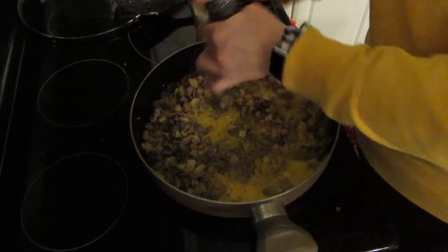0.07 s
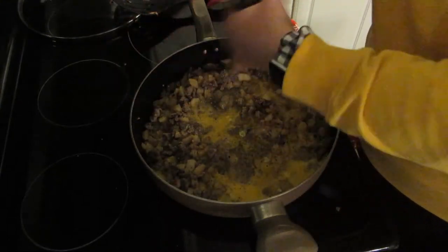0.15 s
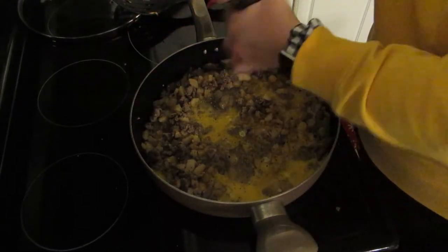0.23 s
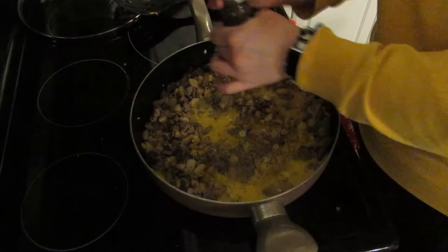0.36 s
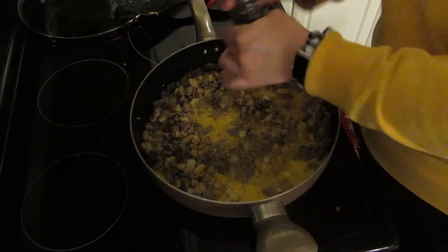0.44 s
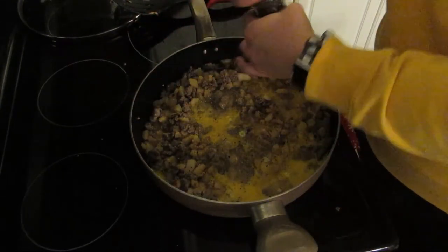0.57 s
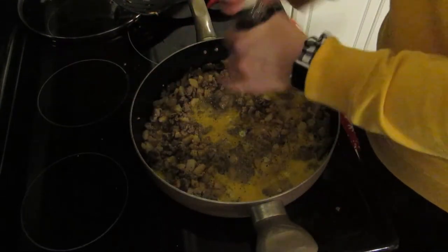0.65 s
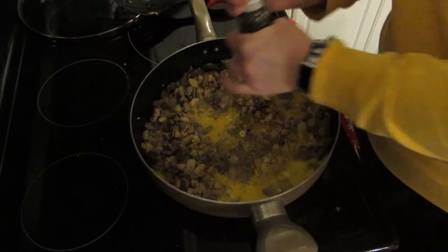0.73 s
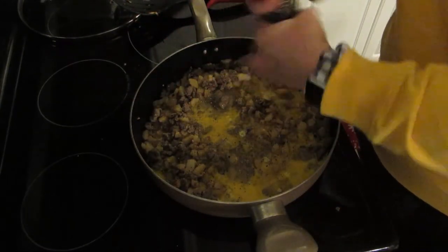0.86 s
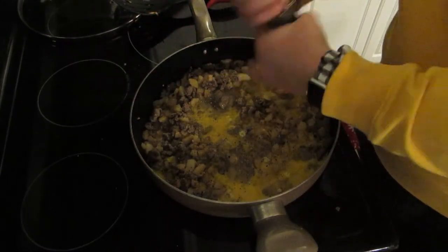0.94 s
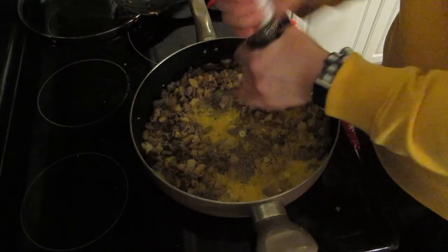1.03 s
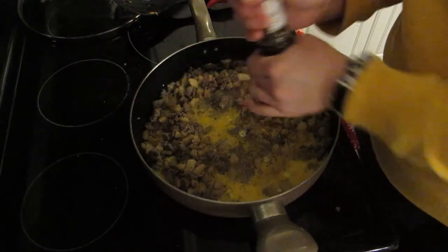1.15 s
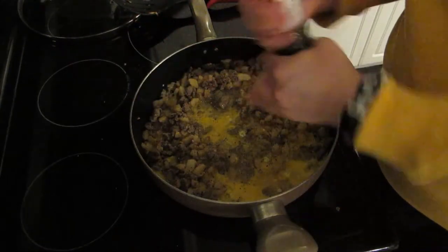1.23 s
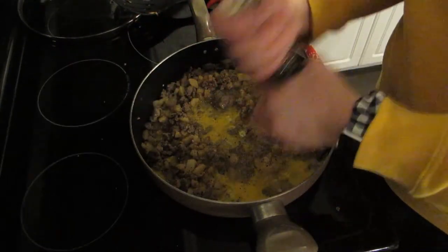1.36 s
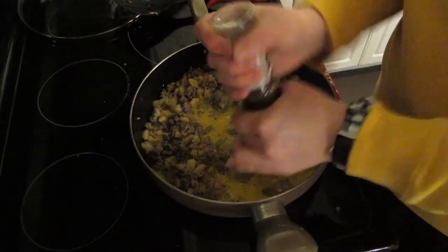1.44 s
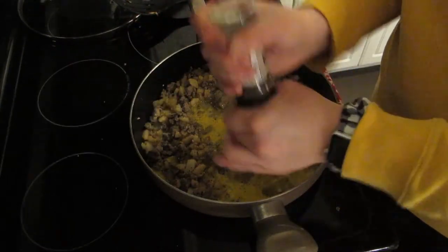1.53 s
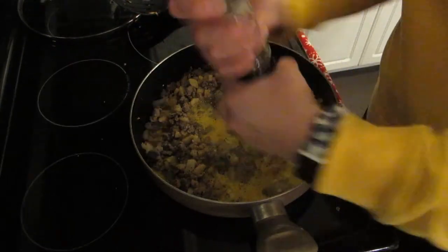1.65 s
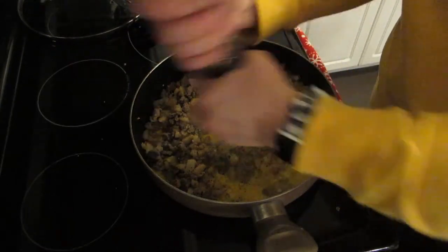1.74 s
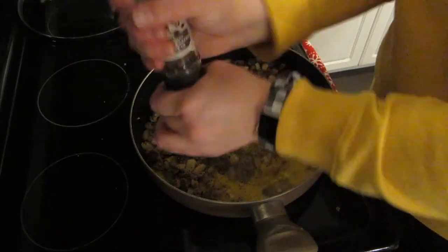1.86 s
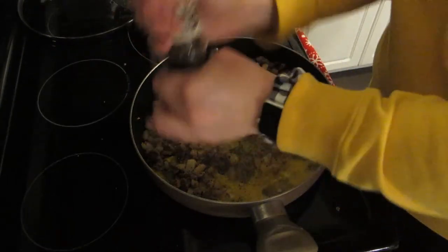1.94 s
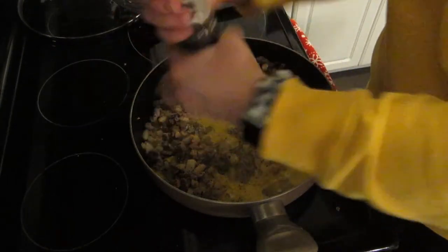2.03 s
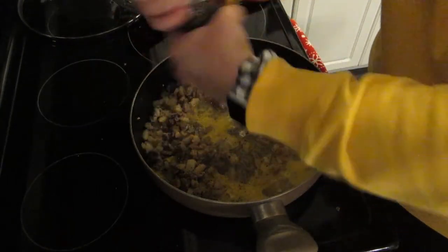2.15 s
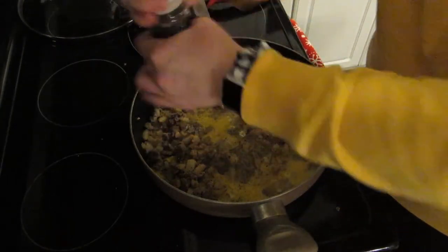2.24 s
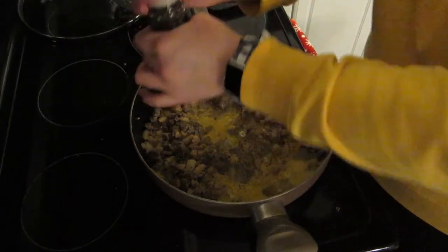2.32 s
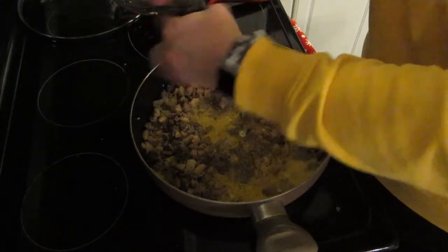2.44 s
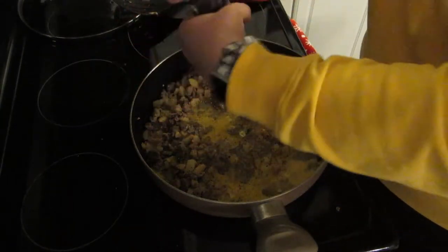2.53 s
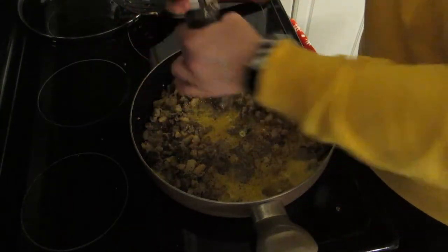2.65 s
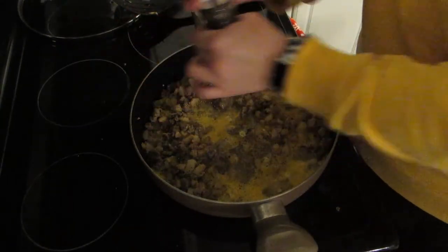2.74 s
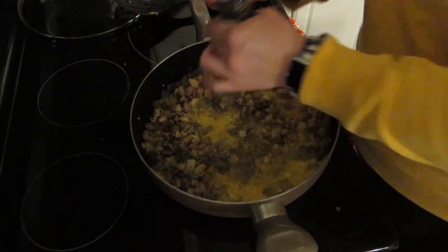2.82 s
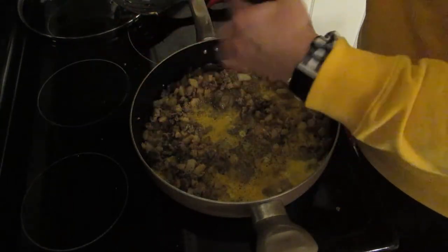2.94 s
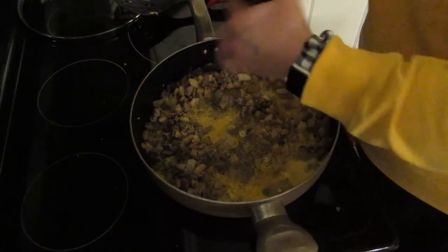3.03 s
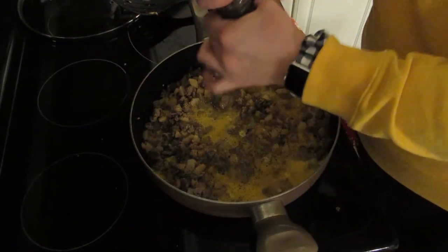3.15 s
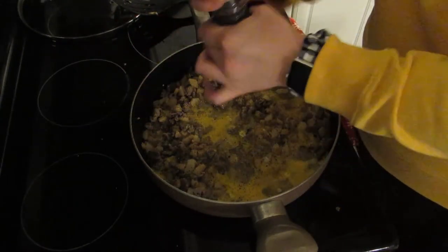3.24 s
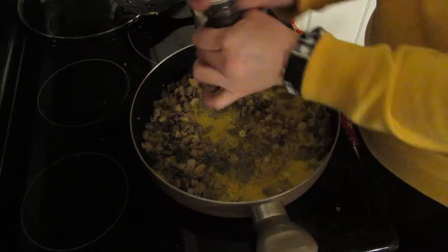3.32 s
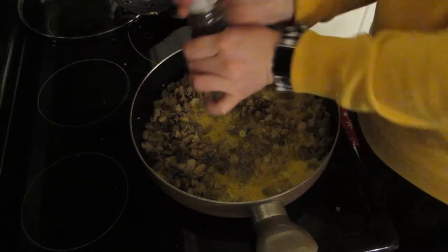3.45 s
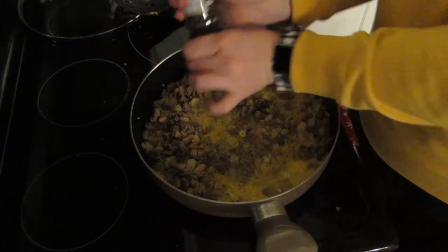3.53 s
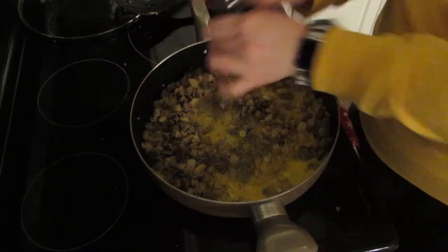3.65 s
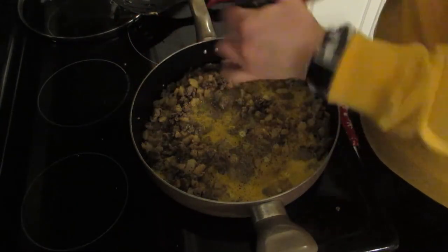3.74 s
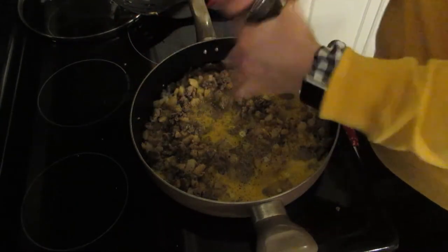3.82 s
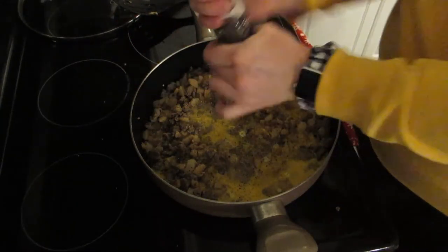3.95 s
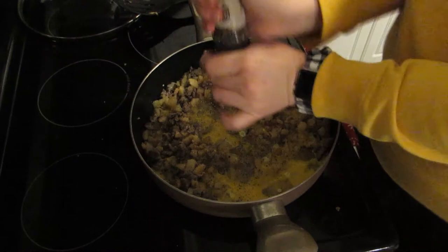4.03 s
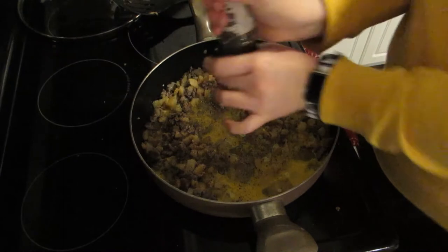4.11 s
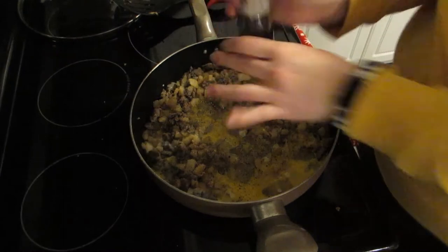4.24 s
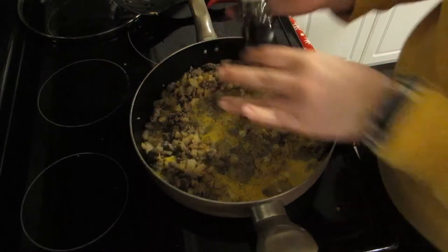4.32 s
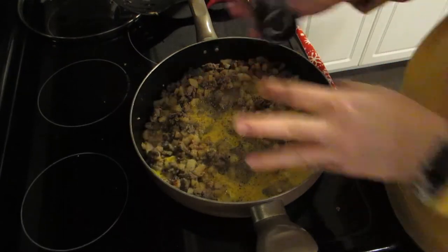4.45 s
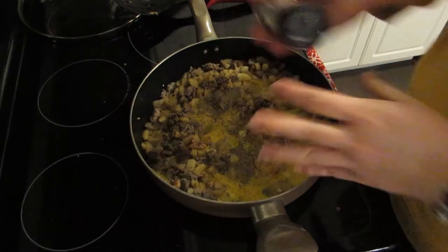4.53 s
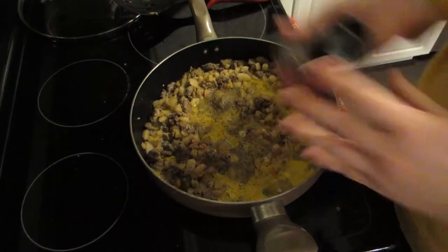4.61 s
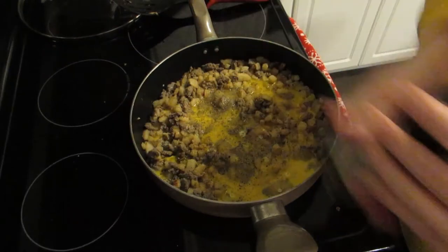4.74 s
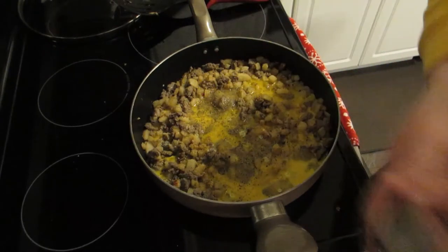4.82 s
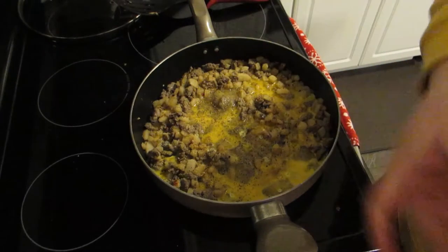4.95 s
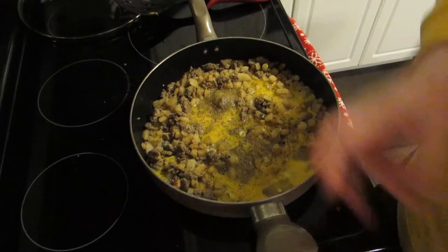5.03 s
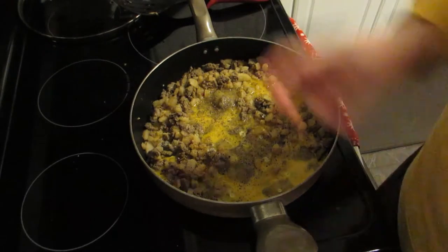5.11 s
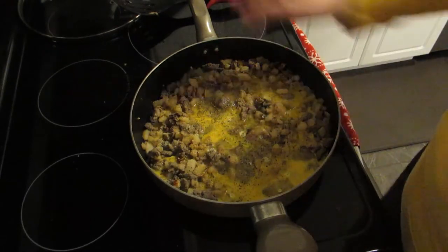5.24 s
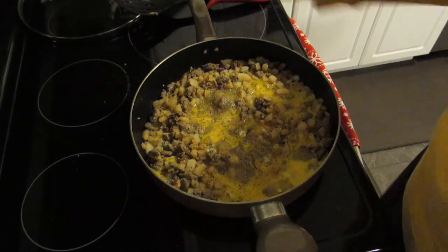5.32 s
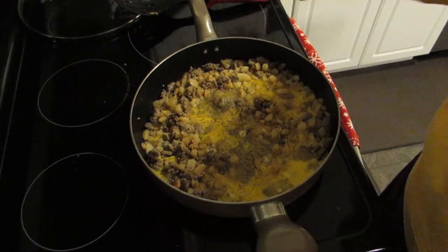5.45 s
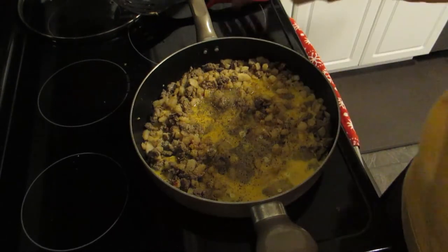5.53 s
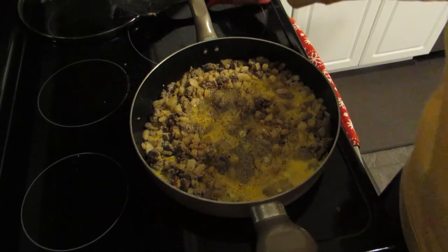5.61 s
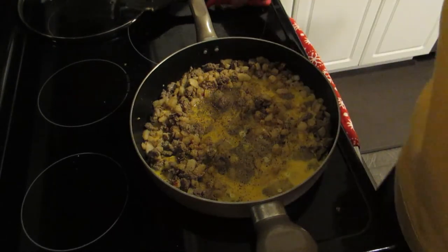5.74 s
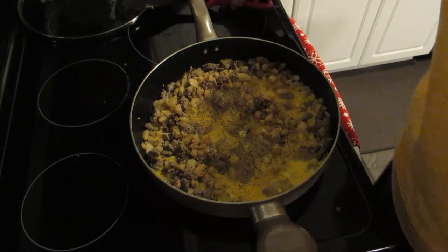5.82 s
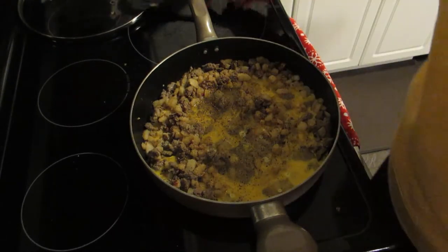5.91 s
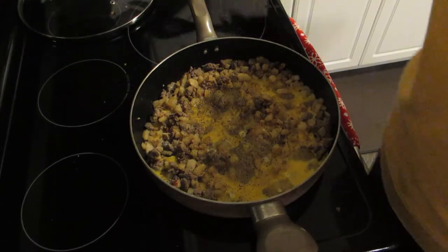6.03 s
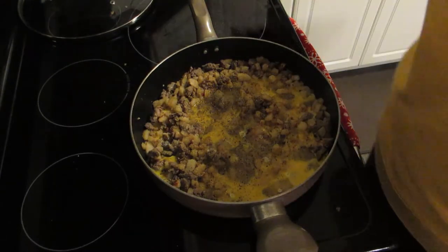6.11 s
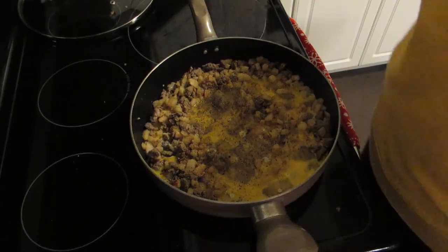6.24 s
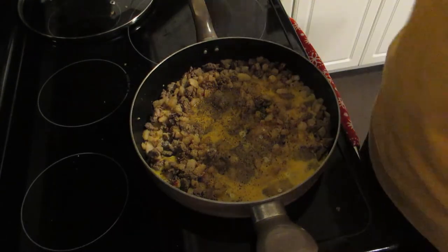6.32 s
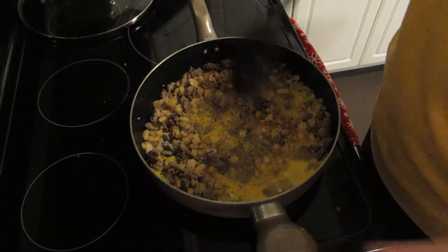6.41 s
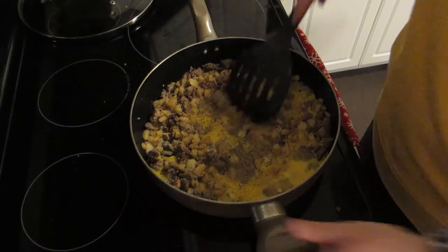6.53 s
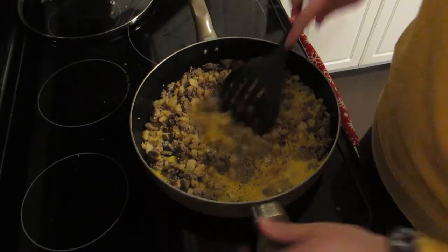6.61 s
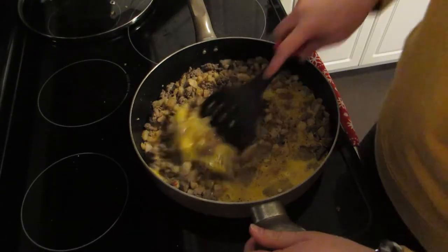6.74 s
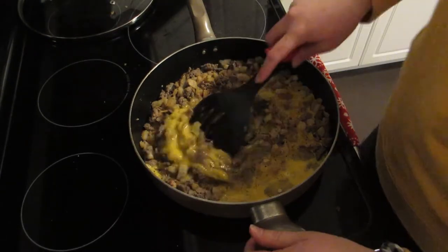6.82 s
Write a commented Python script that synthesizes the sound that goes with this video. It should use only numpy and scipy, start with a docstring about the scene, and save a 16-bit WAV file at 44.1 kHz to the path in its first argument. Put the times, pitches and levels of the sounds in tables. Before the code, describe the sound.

In a small kitchen, a hand-turned pepper mill crunches in short, gritty bursts with sharp cracks, roughly two or three a second, with a longer gap midway. Faint finger hiss fills some pauses. A soft brush follows the last twist, then a loud hollow cupboard bang with small rattling bounces, and finally a dull spatula bump and squelchy stir. Very faint sizzle lies beneath; close stereo microphone, short room echo.

```python
"""Small kitchen: a pepper mill is twisted by hand near a faintly sizzling pan.
Each twist crushes corns in a run of tiny noise-burst fractures that ring the mill body; sharp cracks ring its burr.
After longer pauses, fingers slide back with a thin resonant hiss; one long slide lets go.
Then a cupboard door bangs shut and bounces as decaying modes, and a spatula bumps the pan and stirs the food.
Sizzle and squelch are coloured random clicks; every source feeds a swaying noise reverberation."""
import sys
import numpy as np
from scipy import signal
from scipy.fft import rfft, irfft
from scipy.io import wavfile
from scipy.ndimage import uniform_filter1d

SR = 44100
rng = np.random.default_rng(int(sys.argv[2]) if len(sys.argv) > 2 else 0)


def log_audio(samples):
    """Write samples as a 16-bit WAV file to the path given in sys.argv[1]."""
    # one column per channel
    frames = np.atleast_2d(samples).T
    # limit to full scale, then quantise
    limited = np.clip(frames, -1, 1)
    pcm = np.round(limited * 32767).astype(np.int16)
    wavfile.write(sys.argv[1], SR, pcm)


N = 302967
TIME_S = np.arange(N) / SR
TOP_HZ = 15900

# Levels are relative: the layer gains below come on top.
# Diffuse air murmur. Each row: frequency in Hz, gain in dB.
AIR_COLOUR = [(40, -36), (100, -13), (190, -5), (420, -1.5), (750, -7.5), (1300, -12), (2200, -28),
              (4000, -48)]
# Reverberation time. Each row: band centre in Hz, t60 in seconds.
ROOM_T60_S = [(120, 0.31), (400, 0.4), (1500, 0.32), (4000, 0.28), (8000, 0.28), (15000, 0.11)]
# Side-channel gain of the reverberation. Each row: frequency in Hz, gain in dB.
ROOM_SIDE_DB = [(100, -46), (300, -27), (560, -15), (1100, -9), (2300, -27), (4500, -14), (8000, -8),
                (14000, -0.5)]
# Side-channel gain of the near scatter. Each row: frequency in Hz, gain in dB.
DIRECT_SIDE_DB = [(100, -46), (350, -22), (800, -9), (2500, -30), (4500, -29), (8000, -7.5), (14000, -7)]
# Background level of sizzle and air, dipping after loud sounds and recovering.
# Each row: time in seconds, level in dB.
BACKGROUND_LEVEL = [(0, -48), (3, -45), (3.6, -50), (4.2, -51), (4.8, -48), (5.4, -47), (5.75, -49),
                    (6.3, -48.5), (6.87, -43)]

# Sizzle and kitchen hum. Each row: frequency in Hz, gain in dB.
SIZZLE_COLOUR = [(15, -50), (25, -35), (59, -2.5), (116, -3.5), (284, -7.5), (403, -17), (461, -5.5),
                 (557, -26), (620, -12.5), (1090, -8), (1510, -7), (1980, -8.5), (3990, -10),
                 (13100, -15.5), (15800, -20)]
# Larger spits of fat. Each row: time in seconds, level in dB.
SPITS = [(4.7591, -30), (4.8544, -27), (5.1981, -28), (5.3288, -27), (5.467, -26), (6.3116, -26)]
# Spatula bumps on the pan. Each row: time in seconds, level in dB, contact cut-off in Hz.
BUMPS = [(6.443, -41, 620), (6.6, -32, 180), (6.671, -22.5, 110)]
# Dull pan modes. Each row: frequency in Hz, level in dB, t60 in seconds.
PAN_MODES = [(93, -6.5, 0.14), (131, -4.5, 0.087), (199, -6, 0.085), (424, -3, 0.057)]
# Spatula push. One row: peak in seconds, level in dB, attack and release time constants in seconds.
STIR = (6.735, -32.5, .047, .07)
# Squelch of the food. Each row: frequency in Hz, gain in dB.
STIR_COLOUR = [(120, -17), (220, -1.5), (350, -7.5), (470, 3), (590, -4.5), (850, 4), (1150, -1),
               (1700, -9.5), (2600, -12.5), (5000, -19), (10600, -17.5), (15500, -26)]

# Door bang and bounces. Each row: time in seconds, level in dB, contact cut-off in Hz.
KNOCKS = [(5.578, 0.5, 1200), (5.587, -14, 800), (5.746, -15.5, 1500), (5.793, -17, 280), (5.843, -11, 480),
          (5.863, -11.5, 560)]
# Door modes. Each row: frequency in Hz, level in dB, t60 in seconds.
DOOR_MODES = [(151, -8.5, 0.06), (212, -10, 0.063), (308, -3, 0.048), (434, -4, 0.042), (630, -9, .07),
              (697, -15.5, .08), (795, -18.5, 0.074), (1035, -9.5, 0.027), (1253, -17, 0.039),
              (1460, -10.5, 0.027), (1870, -18.5, .04), (2260, -19.5, 0.034)]
# Door catch modes. Each row: frequency in Hz, level in dB, t60 in seconds.
CATCH_MODES = [(1130, 0, 0.076), (1703, 7, 0.019), (2400, -6, 0.034), (2720, -7, 0.04), (3170, -7, 0.066),
               (3386, -2.5, 0.022), (4980, -17, 0.045)]
# Catch rattle after each knock; its level only partly follows the blow (dB per dB).
RATTLE_LAG_S, RATTLE_DB, RATTLE_DB_PER_DB = .003, -24, .6
# Soft buffer contact before the bang. One row: lead in seconds, level in dB, contact cut-off in Hz.
TOUCH = (.045, -11.5, 300)
# Buffer mode. Each row: frequency in Hz, level in dB, t60 in seconds.
BUFFER_MODES = [(152, 0, 0.055)]

# Handling of the mill. One row: level in dB, end in seconds, release time constant in seconds.
HANDLING = (-57.5, 3.8, .15)
# Handling rumble. Each row: frequency in Hz, gain in dB.
RUMBLE_COLOUR = [(25, -27), (50, -11), (72, 0), (92, -7), (120, -4), (200, -10), (450, -14), (1000, -28)]
# Mill resonances under sliding skin. Each row: frequency in Hz, width in Hz, level in dB.
SLIDE_RINGS = [(5904, 400, 7), (10470, 800, -4), (14750, 520, 0)]
# A pause longer than REGRIP_S brings a slide, centred SLIDE_LEAD_S ahead of the next bite.
REGRIP_S, SLIDE_LEAD_S, SLIDE_S, SLIDE_DB = .2, .115, .16, -48
# Long slide as the hand lets go. One row: middle in seconds, length in seconds, level in dB.
LET_GO = (4.513, .3, -47)
# Palm brushing off. One row: peak in seconds, level in dB, attack and release time constants in seconds.
BRUSH = (4.483, -34, .017, .055)
# Brush hiss. Each row: frequency in Hz, gain in dB.
BRUSH_COLOUR = [(2940, -60), (5000, -34), (5870, -19), (6800, -19), (7340, -10), (9250, -15), (10100, -2),
                (11000, -8), (13100, 0), (13900, 1), (15500, -23)]

# Wrist twists. Each row: teeth catch in seconds, full bite in seconds, end in seconds, level in dB,
# dying-away time constant in seconds, brightness in dB per octave.
TWISTS = [(0, 0, .008, -28, .034, -1), (.229, .25, .306, -17.3, .018, -.2),
          (.604, .62, .668, -18.7, .019, -.4), (.974, .989, 1.114, -17, .0076, -.2),
          (1.369, 1.383, 1.428, -18.3, .0093, -.7), (1.76, 1.765, 1.842, -18.8, .042, -.1),
          (2.165, 2.184, 2.259, -18.8, .036, -.7), (3.095, 3.11, 3.13, -20, .005, .5),
          (3.206, 3.21, 3.327, -27.3, .01, .6), (3.335, 3.339, 3.396, -20.7, .04, .9),
          (3.888, 3.894, 3.997, -19.5, .006, -.3)]
# Sharp cracks and burr slips. Each row: time in seconds, level in dB, brightness in dB per octave,
# burr level in dB.
CRACKS = [(.2687, -1.5, .8, -26), (.3136, -2, 1, -26), (.6373, -3, -.3, -28), (.9884, -3, -.7, -26),
          (1.3845, -1.5, 2.5, -30), (1.418, -10, 0, -13), (1.7666, -3.5, 1, -30), (1.7799, -3, -.8, -30),
          (2.2513, -1, -2, -28), (2.3151, -4.5, -1.7, -30), (2.5958, -4, .4, -23), (2.7609, -3, 1.6, -14),
          (3.112, -1.5, -.7, -8.5), (3.1344, -4.5, .5, -20), (3.2051, 4, 0, -24), (3.3388, -2.3, -.3, -28),
          (3.3681, -4, 0, -30), (3.8949, 2, 2, -26), (3.9677, -.5, -.4, -26), (3.9956, -2.5, 1.8, -30)]
# Mill body colour. Each row: frequency in Hz, gain in dB.
MILL_COLOUR = [(100, -43), (190, -23), (260, -10.5), (450, -7.5), (620, -9.5), (1100, -4.5), (2400, 1),
               (3300, -2.2), (5000, -4.5), (8400, -11.5), (11000, -10), (15500, -15)]
# Mill body resonances. Each row: frequency in Hz, width in Hz, level in dB.
MILL_RINGS = [(450, 97, -6.5), (1490, 310, -9.5), (2520, 270, -12), (4014, 390, 1.5), (6740, 940, 0.5),
              (10050, 990, -4)]
# Burr modes. Each row: frequency in Hz, level in dB, t60 in seconds.
BURR_MODES = [(3800, -6, 0.028), (4050, -4.5, 0.031), (4290, -2, 0.026), (4590, -6.5, 0.02),
              (5060, -7, 0.021), (9620, -6, .035), (10370, -6, 0.03), (11000, -11, 0.025)]
# Burr contact cut-off, and its rise in octaves per (dB per octave) of crack brightness.
CONTACT_HZ, CONTACT_RISE_OCTAVES = 5800, .6
# Catch tick relative to its twist.
GRAB_DB = -8


def undb(db):
    """Decibels to gain."""
    return 10 ** (np.asarray(db) / 20)


def unit(x):
    """Scale to rms 1."""
    return x / np.sqrt(np.mean(x ** 2))


def curve(rows):
    """Gain over time, interpolated in dB from (s, dB) rows."""
    s, db = np.transpose(rows)
    return undb(np.interp(TIME_S, s, db))


def swell(peak_s, db, attack_s, release_s):
    """Gain that grows exponentially to a peak and dies away."""
    return undb(db) * np.exp(-np.maximum((peak_s - TIME_S) / attack_s, (TIME_S - peak_s) / release_s))


def held(db, end_s, release_s):
    """Gain that holds, then dies away exponentially."""
    return undb(db) * np.exp(-np.maximum(TIME_S - end_s, 0) / release_s)


def stroke(middle_s, length_s, db):
    """Gain of a hand movement that speeds up and slows again."""
    return undb(db) * np.cos(np.pi * np.clip((TIME_S - middle_s) / length_s, -.5, .5))


def bins(size):
    """Frequencies of a real spectrum in Hz."""
    return np.fft.rfftfreq(size, 1 / SR)


def at(points, hz):
    """Read (Hz, value) points on a log-frequency axis."""
    f, value = np.transpose(points)
    return np.interp(np.log(hz + 1), np.log(f), value)


def colour(x, points):
    """Shape a steady sound by (Hz, dB) points."""
    size = x.shape[-1]
    return irfft(rfft(x) * undb(at(points, bins(size))), size)


def humps(rings, hz):
    """Summed bell-shaped response of (Hz, width Hz, dB) resonances."""
    return sum(undb(db) / (1 + (2 * (hz - f) / width) ** 2) for f, width, db in rings)


def causal(db, size):
    """Minimum-phase impulse response of unit energy: no sound ahead of the hit."""
    cepstrum = irfft(np.log(undb(db)))
    cepstrum[1:size // 2] *= 2
    cepstrum[size // 2 + 1:] = 0
    response = irfft(np.exp(rfft(cepstrum)))
    return response / np.linalg.norm(response)


def through(x, response):
    """Convolve, keeping the length."""
    return signal.fftconvolve(x, response)[:N]


def place(times_s, sounds):
    """Lay short sounds on the time line."""
    out = np.zeros(N)
    for s, sound in zip(times_s, sounds):
        i = int(np.clip(s * SR, 0, N - 1))
        out[i:i + len(sound)] += sound[:N - i]
    return out


def crackle(rate_hz, spread_db):
    """Random clicks of scattered size and sign, rms 1."""
    sizes = undb(spread_db * np.clip(rng.standard_normal(N), -2, 2))
    hits = rng.random(N) < rate_hz / SR
    return unit(hits * sizes * rng.choice([-1, 1], N))


def fractures(times_s, db, pitch_hz, tilt_db, decay_s, hump_db=4.5, hump_octaves=0.32, size=512):
    """Each fracture is a short noise burst with a spectral hump at its pitch and a tilt in dB per octave."""
    t = np.arange(size) / SR
    envelope = np.sqrt(t / decay_s) * np.exp(-t / decay_s)
    octaves = np.log2(np.clip(bins(size), 250, 14000) / pitch_hz[:, None])
    hump = hump_db * np.exp(-(octaves / hump_octaves) ** 2)
    shape = undb(tilt_db[:, None] * octaves + hump)
    noise = rng.standard_normal((len(times_s), size))
    grit = irfft(rfft(noise) * shape) * envelope
    # equal energy per burst, whatever its colour
    grit *= np.linalg.norm(envelope) / np.linalg.norm(grit, axis=1, keepdims=True)
    return 2 * place(times_s, grit * undb(db)[:, None])


def blows(rows, modes, thud_db, thud_s, low_hz):
    """Blows ring an object's modes and a short noise thud; a softer contact leaves out the highs."""
    t = np.arange(SR // 2) / SR
    ring = np.zeros(len(t))
    for k, (hz, db, t60_s) in enumerate(modes):
        ring += (-1) ** k * undb(db) * np.sin(2 * np.pi * hz * t) * 1000 ** (-t / t60_s)
    sounds = []
    for _, db, soft_hz in rows:
        thud = undb(thud_db) * rng.standard_normal(len(t)) * np.exp(-t / thud_s)
        contact = signal.butter(2, min(soft_hz, SR / 3), fs=SR, output="sos")
        sounds.append(undb(db) * signal.sosfilt(contact, ring + thud))
    # a high-pass thins what lies below low_hz
    high_pass = signal.butter(2, low_hz, "high", fs=SR, output="sos")
    return signal.sosfilt(high_pass, place([row[0] for row in rows], sounds))


def air(air_db=-9):
    """Soft low noise all round, separate for each ear, at the background level."""
    murmur = unit(colour(rng.standard_normal((2, N)), AIR_COLOUR))
    return undb(air_db) * curve(BACKGROUND_LEVEL) * murmur


def reverberation(build_s=0.0013):
    """A diffuse noise tail of unit energy whose bands die at their own rates."""
    t = np.arange(SR * 3 // 4) / SR
    noise, hz = rfft(rng.standard_normal(len(t))), bins(len(t))
    tail = np.zeros(len(t))
    for k, (_, t60_s) in enumerate(ROOM_T60_S):
        share = at([(f, float(j == k)) for j, (f, _) in enumerate(ROOM_T60_S)], hz)
        tail += irfft(noise * share, len(t)) * np.exp(-np.log(1000) * t / t60_s)
    tail *= 1 - np.exp(-(t / build_s) ** 2)
    return tail / np.linalg.norm(tail)


def kitchen(x, sway_hz=5., count=3):
    """The echo pattern of every source sways steadily among several noise tails."""
    out = np.zeros(N)
    for k in range(count):
        sway = np.cos(2 * np.pi * sway_hz * TIME_S + np.pi * k / count)
        out += through(x * sway, reverberation())
    return out * np.sqrt(2 / count)


def near_surfaces(decay_s=0.006, size=512):
    """Decaying noise response: scatter off hob and pan, which differs between the ears."""
    scatter = rng.standard_normal(size) * np.exp(-np.arange(size) / SR / decay_s)
    return scatter / np.linalg.norm(scatter)


def sizzle(pops_db=-3, bed_db=-3, spit_db=-7.5, spit_hz=5500):
    """Tiny bursting bubbles click over a bed of hiss and room hum, with a few louder spits."""
    bed = undb(bed_db) * rng.standard_normal(N)
    pops = undb(pops_db) * crackle(rate_hz=450, spread_db=3)
    s, db = np.transpose(SPITS)
    pitch_hz, tilt_db = np.full(len(s), spit_hz), np.full(len(s), -1.5)
    spits = fractures(s, db + spit_db, pitch_hz, tilt_db, decay_s=.001, hump_db=9)
    return unit(colour(bed + pops, SIZZLE_COLOUR)) * curve(BACKGROUND_LEVEL) + spits


def spatula():
    """The blade bumps the pan's modes and squelches through the food as coloured clicks."""
    squelch = unit(colour(crackle(rate_hz=700, spread_db=1), STIR_COLOUR))
    bumps = blows(BUMPS, PAN_MODES, thud_db=10, thud_s=0.021, low_hz=70)
    return squelch * swell(*STIR) + bumps


def cupboard(catch_hardness=2.8):
    """The door touches its buffer, bangs shut and bounces; its harder catch rattles along."""
    lead_s, touch_db, touch_hz = TOUCH
    touch_row = (KNOCKS[0][0] - lead_s, touch_db, touch_hz)
    touch = blows([touch_row], BUFFER_MODES, thud_db=-5, thud_s=0.0081, low_hz=89)
    panel = blows(KNOCKS, DOOR_MODES, thud_db=-5.5, thud_s=0.0055, low_hz=55)
    rattle_rows = [(s + RATTLE_LAG_S, RATTLE_DB + RATTLE_DB_PER_DB * db, catch_hardness * hz)
                   for s, db, hz in KNOCKS]
    rattles = blows(rattle_rows, CATCH_MODES, thud_db=-12, thud_s=0.007, low_hz=800)
    return touch + panel + rattles


def handling(rumble_db=-1):
    """The turning mill and the moving arms add low-coloured noise."""
    return undb(rumble_db) * held(*HANDLING) * unit(colour(rng.standard_normal(N), RUMBLE_COLOUR))


def fresh_grips():
    """Rows of the twists that follow a pause."""
    rows = np.array(TWISTS)
    pauses_s = rows[1:, 1] - rows[:-1, 2]
    return rows[1:][pauses_s > REGRIP_S]


def fingers(flutter_db=3.5):
    """Skin sliding over the mill hisses in its narrow high resonances; the palm brushes off it."""
    hiss = unit(irfft(rfft(rng.standard_normal(N)) * humps(SLIDE_RINGS, bins(N)), N))
    bites_s = fresh_grips()[:, 1]
    speed = sum(stroke(s - SLIDE_LEAD_S, SLIDE_S, SLIDE_DB) for s in bites_s) + stroke(*LET_GO)
    flutter = undb(flutter_db * unit(uniform_filter1d(rng.standard_normal(N), size=900)))
    brush = unit(colour(crackle(rate_hz=5500, spread_db=11), BRUSH_COLOUR))
    return hiss * speed * flutter + brush * swell(*BRUSH)


def grabs(pitch_hz=4000, tilt_db=-.3):
    """With each fresh grip the teeth catch on the corns: one small fracture tick."""
    catch_s, _, _, db, _, _ = fresh_grips().T
    pitches_hz, tilts_db = np.full(len(db), pitch_hz), np.full(len(db), tilt_db)
    return fractures(catch_s, db + GRAB_DB, pitches_hz, tilts_db, decay_s=.0016, hump_db=2.5)


def crushing(rate_hz=300, scatter_db=3.5, crumb_hz=2600, spread_octaves=1.3, bite_db=20, count=170):
    """The burr bites, then corns crumble in quick uneven succession, fading as the wrist stops."""
    out = np.zeros(N)
    for catch_s, bite_s, end_s, level_db, ease_s, tilt_db in TWISTS:
        gap, size, pitch, tilt = rng.standard_normal((count, 4)).T
        times_s = catch_s + np.cumsum(np.exp(0.55 * gap)) / rate_hz
        rise_db = np.interp(times_s, [catch_s, max(catch_s, bite_s)], [-bite_db, 0])
        fall_db = 20 / np.log(10) * np.maximum(times_s - end_s, 0) / ease_s
        db = level_db + rise_db - fall_db + scatter_db * np.clip(size, -2, 1.5)
        pitch_hz = crumb_hz * 2 ** (spread_octaves * pitch)
        out += fractures(times_s, db, pitch_hz, tilt_db + 0.42 * tilt, decay_s=0.0012)
    return out


def mill(crack_db=-10, crack_hz=2600, crush_db=-2.5, crumbs_db=1, size=2048):
    """Catches, crumbling, cracks and loose crumbs ring one small body; cracks and slips ring the burr."""
    s, db, tilt_db, burr_db = np.transpose(CRACKS)
    cracks = fractures(s, db + crack_db, np.full(len(s), crack_hz), tilt_db, decay_s=0.0016, hump_db=1.2)
    crumbs = undb(crumbs_db) * held(*HANDLING) * crackle(rate_hz=2000, spread_db=13.5)
    grinding = grabs() + cracks + undb(crush_db) * crushing() + crumbs
    hz = bins(size)
    body = causal(at(MILL_COLOUR, hz) + 20 * np.log10(1 + humps(MILL_RINGS, hz)), size)
    # brighter cracks strike the burr harder
    contact_hz = CONTACT_HZ * 2 ** (CONTACT_RISE_OCTAVES * tilt_db)
    strikes = list(zip(s, burr_db, contact_hz))
    burr = blows(strikes, BURR_MODES, thud_db=-2.5, thud_s=0.0032, low_hz=3100)
    return through(grinding, body) + burr


def scene(mill_room_db=-5, door_room_db=-6.0, pan_room_db=-6, pan_db=-1):
    """Mill, pan and door heard directly and through the kitchen, in stereo with the air."""
    hands = mill() + fingers() + handling()
    pan = undb(pan_db) * (sizzle() + spatula())
    door = cupboard()
    direct = hands + pan + door
    send = undb(mill_room_db) * hands + undb(pan_room_db) * pan + undb(door_room_db) * door
    mid = direct + kitchen(send)
    room_side = colour(kitchen(send), ROOM_SIDE_DB)
    direct_side = colour(through(direct, near_surfaces()), DIRECT_SIDE_DB)
    side = room_side + direct_side
    return np.array([mid + side, mid - side]) + air()


def record(dry):
    """The hardest peaks overload the microphone and are rounded; the top is cut."""
    rounded = dry / (1 + dry ** 4) ** .25
    return signal.sosfilt(signal.ellip(10, .2, 80, TOP_HZ, fs=SR, output="sos"), rounded)


dry = scene()
out = record(dry)
log_audio(out)
```